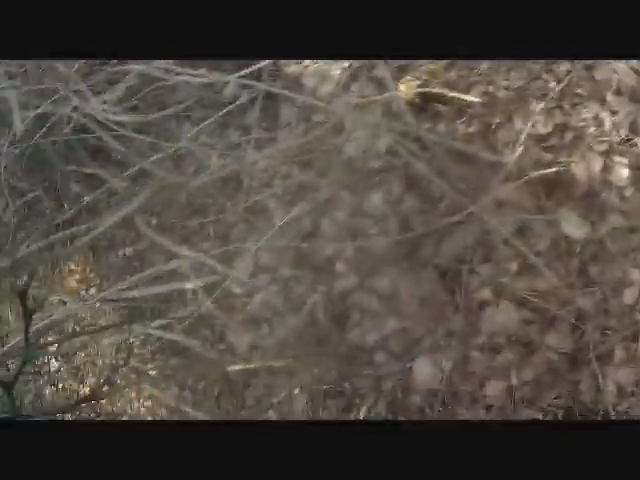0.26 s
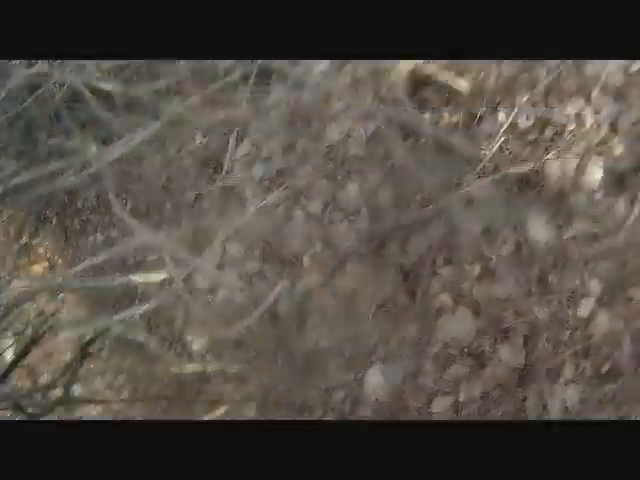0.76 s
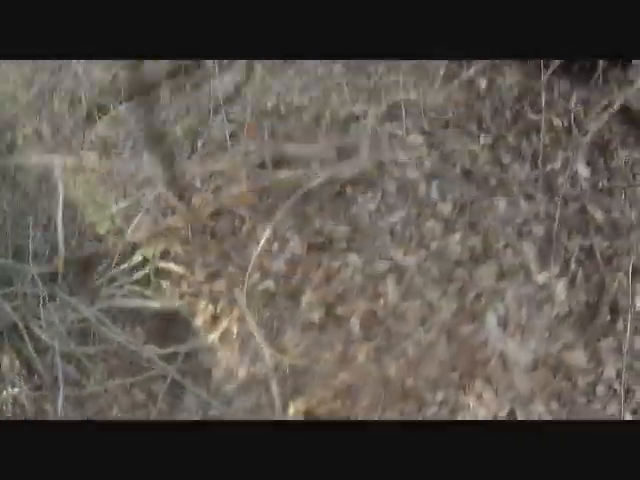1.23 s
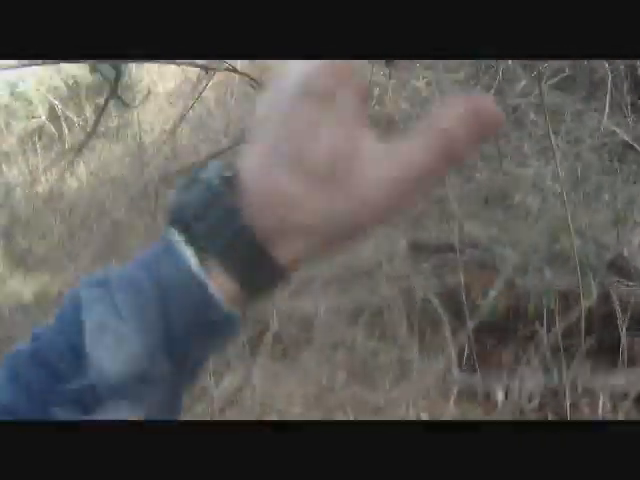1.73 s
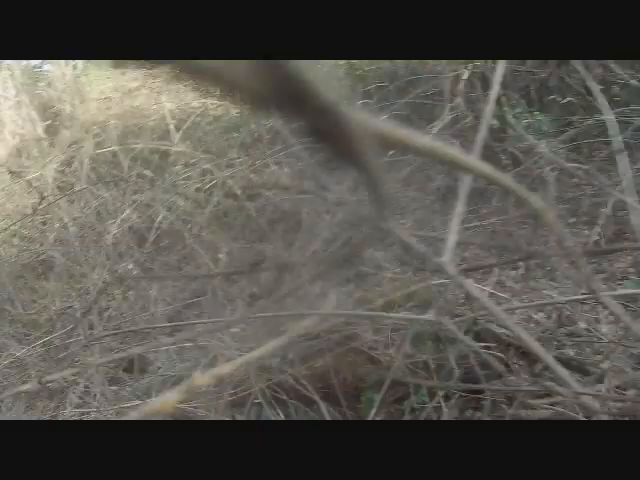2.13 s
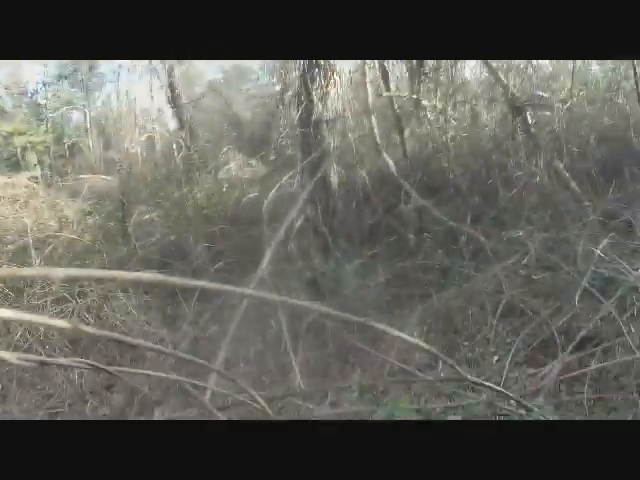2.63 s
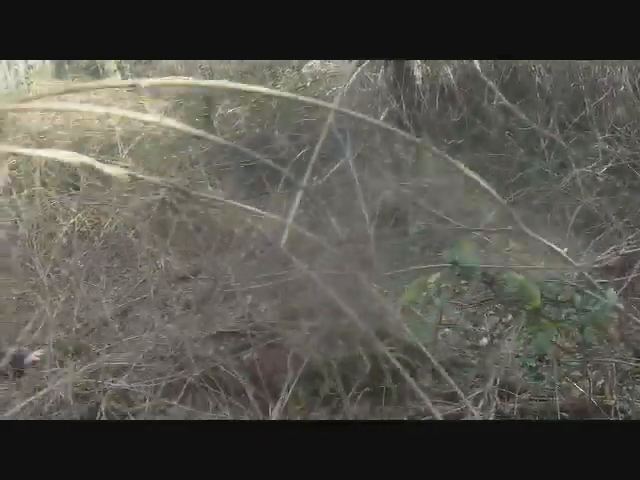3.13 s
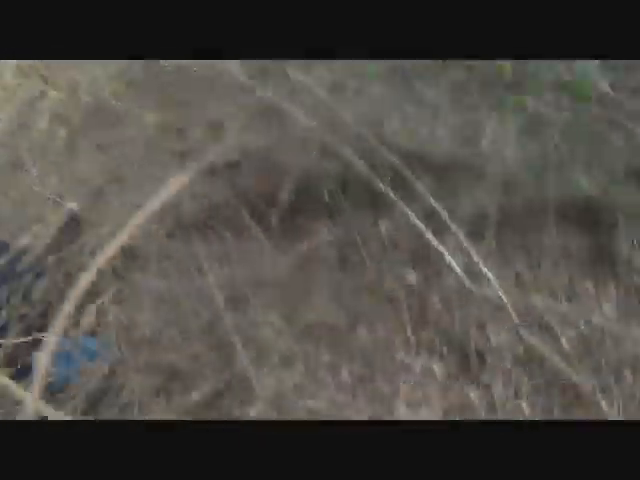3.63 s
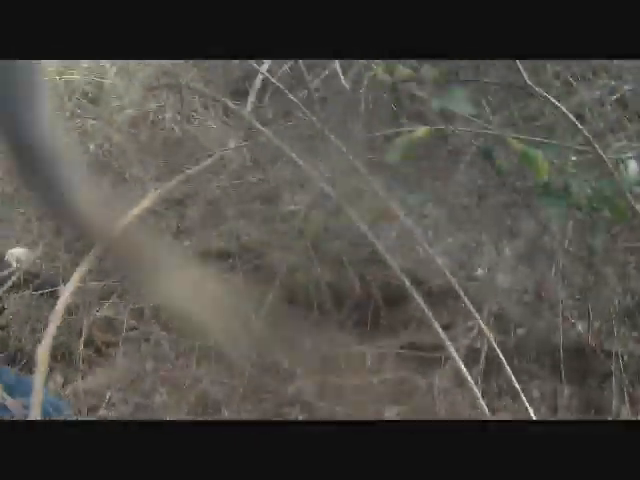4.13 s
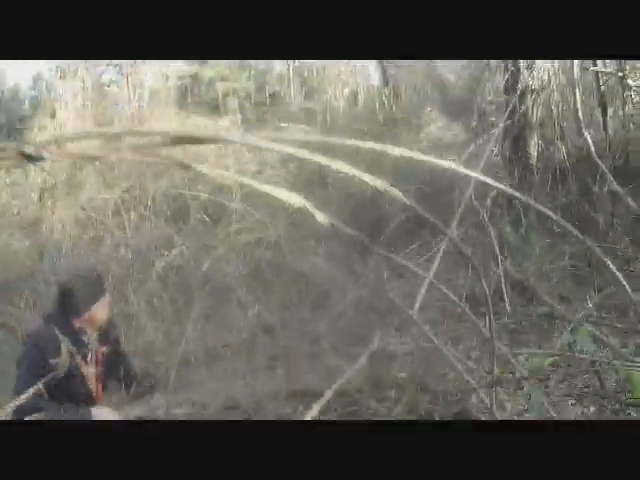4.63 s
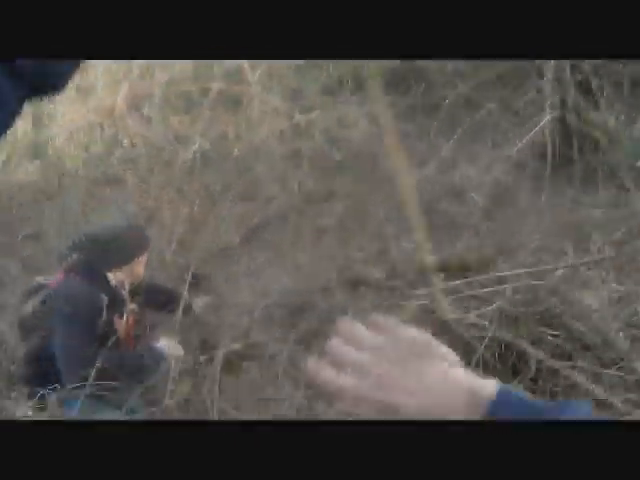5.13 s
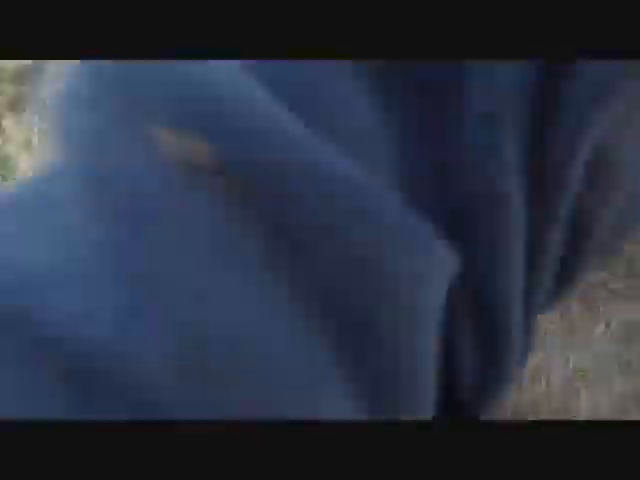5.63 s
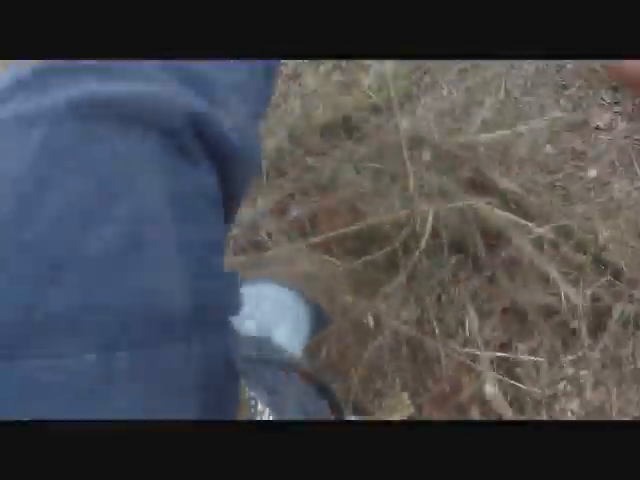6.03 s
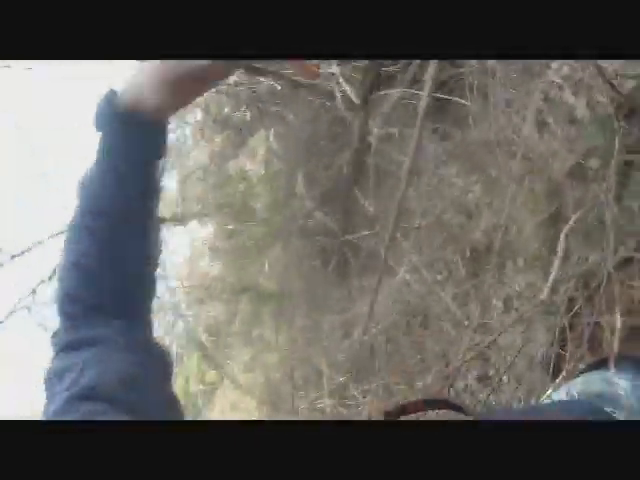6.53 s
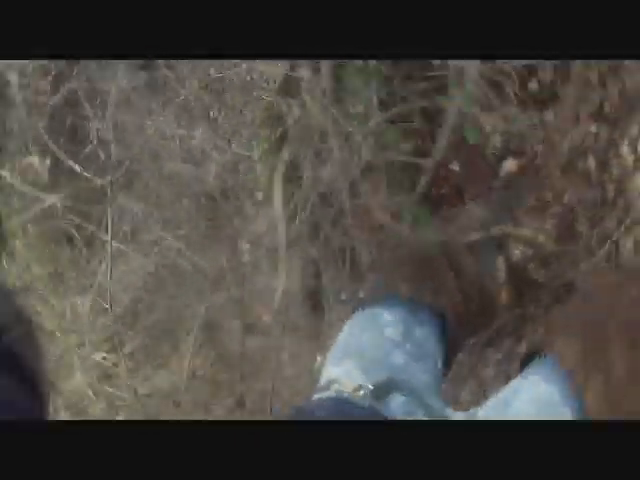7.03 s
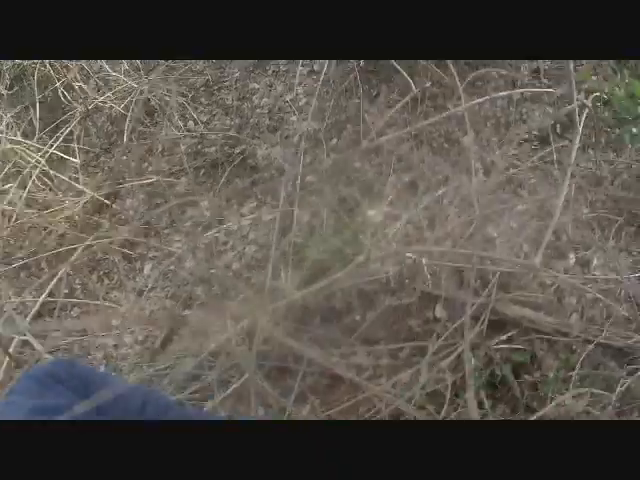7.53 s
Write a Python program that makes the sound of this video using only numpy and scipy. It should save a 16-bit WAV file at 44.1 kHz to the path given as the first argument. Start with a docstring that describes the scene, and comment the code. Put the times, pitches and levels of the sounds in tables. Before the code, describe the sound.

Someone forces a way through dry undergrowth outdoors, heard from a body-worn microphone sealed in a small plastic case. It begins with muffled leaf rustle and a few clicks, then twigs slap and scrape the hollow shell in dense, overloaded bursts. Rough dragging continues with knocks and crackle, then stops near the end, leaving dull rustle and cloth rumble.

```python
"""Cased camera pushed through dry brush

Someone pushes through dry undergrowth with a small camera in a sealed plastic case on the body.
Twigs drag over the case and slap it: shaped noise and short bursts ring the air inside and the shell.
Leaves rustle dully outside as filtered noise with faint ticks; clothing shoves the mount as low rumble.
Hard slaps overload the recorder, which ducks its gain for a moment.
"""
import sys
import numpy as np
from scipy import signal
from scipy.fft import rfft, irfft, next_fast_len
from scipy.io import wavfile
from scipy.ndimage import uniform_filter1d, map_coordinates

SR = 44100
rng = np.random.default_rng(int(sys.argv[2]) if len(sys.argv) > 2 else 0)


def generate_wav(signal):
    """Clip the signal to [-1, 1] and save it as 16-bit WAV at the path in sys.argv[1]."""
    frames = np.transpose(np.atleast_2d(signal))
    scaled = np.clip(frames, -1, 1) * 32767
    pcm = np.round(scaled).astype(np.int16)
    wavfile.write(sys.argv[1], SR, pcm)


N = 342642

# Twig slaps: start_s, shell_peak_db, boom_peak_db, struck_panel_hz
SLAPS = [(0.542, -6.5, 0, 1720), (0.554, -15, 4.5, 2220), (0.805, -13, -34, 5630),
         (0.968, -17.5, -2.5, 1380), (0.997, 4.5, -7.5, 3430), (1.024, -18, -27, 3320),
         (1.076, -17, -27, 3260), (1.094, -0.5, -9.5, 3160), (1.114, 2, -25, 3530), (1.124, 1.5, -27, 3260),
         (1.161, -12.5, -10.5, 1700.0), (1.286, -21, -28, 2500), (1.338, -8, -10, 3500),
         (1.363, 8.5, -1, 3050), (1.378, 8.5, 1.5, 2410), (1.411, -3, -21, 3600), (1.436, -6, -20, 5500),
         (1.464, 2.5, -4, 3680), (1.483, 3, -5, 5370), (1.509, 2.5, -7, 3400), (1.524, 2.5, -13, 1500),
         (1.572, 8, 9, 3500), (1.625, -5, -14, 2260), (1.788, 4.5, -21, 1430), (1.8, 6, -26, 3330),
         (1.84, -2, -8, 3200), (1.872, 4.5, -1, 3200), (1.885, 6, 0, 1920), (2.028, 10, 3, 3050),
         (2.086, 11.5, -34, 1310), (2.202, 4.5, -1, 1580), (2.242, 1.5, -6, 1550), (2.324, -0.5, -26, 1530),
         (2.349, -3, 5.5, 2010), (2.359, 11.5, 8, 2100), (2.67, -12, -2, 1590), (2.937, -13, -4.5, 1400),
         (3.02, -36, -7.5, 2470), (3.044, -9, -29, 2830), (3.222, -10, -7, 4370), (3.256, -16, -7.5, 1600),
         (3.62, 0.5, 5, 1960), (3.676, -10, -11, 2660), (3.949, 4, -4, 1240), (4.034, -5, -9.5, 1580),
         (4.134, -6, -11, 1500), (4.232, 0, 4, 2250), (4.29, -3.5, -17, 1620), (4.353, 0, -20.5, 1480),
         (4.648, 7, -20, 3150), (4.686, 5.5, -6, 1670), (4.953, 6, 6.5, 2920), (5.197, -16, -2.5, 1660.0),
         (5.213, -4, -2, 1640), (5.247, -4.5, -6, 2130), (5.347, -3, -3.5, 1220), (5.519, -1.5, -1, 3330),
         (5.566, 2, 1.5, 1840), (5.742, -2, -5, 2500), (5.752, -0.5, -9, 1700), (5.768, 8, 0, 1680),
         (5.943, 2, -1.5, 1330), (5.995, 1, 0.5, 1680), (6.082, -3.5, 1, 3260), (6.213, 2, 3, 2830),
         (6.266, -35, -4, 1210), (6.282, -17, -5, 1500), (6.318, -0.5, 3, 1620), (6.365, -2, -7, 1580),
         (6.433, 8.5, -0.5, 1520), (6.644, 5.5, 4.5, 1700), (6.834, -40, -13.5, 1770.0),
         (6.917, -15.5, -13, 2620)]
# Clothing shoving the mount: time_s, level_db
CLOTH_SHOVES = [(0.0, -39), (2.4, -34), (3.0, -51), (5.2, -42.5), (5.7, -35), (6.6, -38.5), (7.35, -32),
                (7.5, -41), (7.77, -37)]
# Air resonance in the case: centre_hz, width_hz, level_db
CAVITY = [(772, 219, 0)]
# Resonances of the plastic shell: centre_hz, width_hz, level_db
SHELL_MODES = [(1608, 440, 1.5), (2530, 506, 2.5), (3104, 390, 3.5), (3610, 230, 1), (4667, 775, -2.5)]
# Tone of the scraping hiss: frequency_hz, relative_density_db (per Hz)
HISS_TONE = [(4000, -0.5), (5800, -1), (8500, -16), (12500, -19), (15200, -34)]
# Tone of the mount and camera rumble: frequency_hz, relative_density_db (per Hz)
RUMBLE_TONE = [(15, -17), (30, -3.5), (70, 0.5), (180, -10), (400, -14), (600, -15)]
# Tone of the muffled leaves: frequency_hz, relative_density_db (per Hz)
LEAF_TONE = [(150, -22), (350, -6.5), (800, -5.5), (1050, -20.5), (5000, -31), (9000, -41), (15000, -40)]
# Brush leaning on the case: time_s, shell_level_db, boom_over_shell_db
LEANING_BRUSH = [(0.0, -46, 0.5), (0.93, -51, -2), (1.1, -40.5, 10), (1.35, -39, 6), (1.6, -42.5, 0.5),
                 (2.4, -34, 13.5), (2.62, -19, -4), (2.83, -28.5, 6.5), (3.05, -26, 8.5), (3.45, -25.5, 5),
                 (3.9, -21.5, 2.5), (4.11, -32.5, 3), (4.6, -24, 3), (5.0, -18, -0.5), (5.55, -24, 3.5),
                 (6.05, -35, 6.5), (6.7, -26, -3), (6.81, -44.5, 14.5), (7.2, -58, -13), (7.77, -50.5, 1)]
# Single twigs scraping past: start_s, length_s, loudest_at_share (0-1),
# shell_level_db, boom_over_shell_db, hiss_over_shell_db
SCRAPES = [(0.445, 0.13, 0, -32.5, 11.5, -8.5), (0.996, 0.021, 0.03, -20, 8, 1.5),
           (1.075, 0.029, 0.6, -25.5, 8, -26), (1.181, 0.072, 0.9, -30, 13.5, 0),
           (1.283, 0.12, 0.77, -24.5, 8, 1), (1.446, 0.08, 1, -22.5, -8, 2.5),
           (1.692, 0.035, 0.27, -30, -1, 6), (1.722, 0.077, .7, -35, 11.5, 3),
           (1.791, 0.025, 0.44, -7, -2, -5.5), (1.818, 0.07, 0.9, -16.5, -9, -0.5),
           (1.992, 0.037, 0.6, -8, -3, -10.5), (2.04, 0.065, 0.8, -11, -5, -2),
           (2.098, 0.098, 0.9, -19, -1, -2), (2.258, 0.16, 0.36, -18, -11, -7.5),
           (2.416, 0.13, 0.2, -27, -8, 4), (2.636, 0.16, 0.83, -17.5, 6.5, -16.5),
           (3.256, 0.2, 0.18, -16.5, -3, -10.5), (3.447, 0.11, 0.8, -13.5, -6, -9.5),
           (3.659, 0.028, 0.3, -14, -15, -5), (3.69, 0.015, 0.2, -14, 10.5, -20),
           (3.724, 0.043, 0.25, -17, -19, -6), (3.777, 0.061, 0.5, -12.5, -19, -22),
           (3.95, 0.075, 0.1, -18.5, 0, -20), (4.138, 0.15, 0.6, -11, -6, -13),
           (4.409, 0.043, 0.15, -20.5, -21, -15), (4.465, 0.065, 0.9, -12.5, -14, -5),
           (4.552, 0.09, 1, -16, -0.5, -7), (4.828, 0.107, 0.8, -23.5, 8, -28),
           (5.495, 0.084, 0.15, -17, 0, -25), (5.621, 0.16, 0.51, -13, 1, -10.5),
           (5.78, 0.12, 0, -19.5, 0, -7), (5.87, 0.083, 0.95, -15, 1, -18),
           (5.956, 0.048, 0.95, -19.5, 5, -24), (6.076, 0.039, 0.02, -17, 2, -9),
           (6.295, 0.013, 0.4, -11, -10, -18), (6.358, 0.043, 0.1, -23.5, 8.5, -18),
           (6.437, 0.036, 0.4, -17, 10, -27), (6.51, 0.041, 0.66, -17, -14, -12),
           (6.676, .12, 1, -17.5, -0.5, -6), (6.916, 0.094, 0.4, -22, 1.5, 2),
           (7.001, 0.098, 0.83, -25, 5, -1.5)]
# Blunt knocks on the microphone port: start_s, push_level_db, push_length_s
PORT_KNOCKS = [(2.0896, 12, 0.0035), (7.077, -12, 0.011), (7.268, -16, .014)]
# Thin corners of the case ringing over the hiss: centre_hz, width_hz, level_db
CORNER_MODES = [(7340, 470, 1.5), (9650, 1300, 8)]

SWELL_DB, FADE_DB = 9, 5.5  # a scrape's shell and boom start and end this far under their peak
TOUCH_S, RELEASE_S = 0.0078, 0.01  # time to land on the case and to leave it
BED_HISS_DB = -50.5  # faint hiss of the leaning brush
HISS_GROWS = 1.8  # the hiss swells more steeply than the rattle, as a factor on dB
TOP_HZ = 15500  # upper end of the recorder's band


def amp(db):
    """Decibels to linear amplitude."""
    return 10 ** (np.asarray(db) / 20)


def unit(x):
    """Scale to rms 1."""
    return x / np.sqrt(np.mean(x ** 2) + 1e-20)


def curves(rows):
    """Draw one value per sample for each column after the time."""
    times_s, *columns = np.transpose(rows)
    return [np.interp(np.arange(N) / SR, times_s, column) for column in columns]


def wobble(rate):
    """A smooth random curve, rate knots a second."""
    knots = rng.standard_normal(int(N * rate / SR) + 4)
    return map_coordinates(knots, [np.arange(N) * rate / SR])


def filtered(x, response):
    """Shape x with a complex response of frequency."""
    size = next_fast_len(len(x) + 4096)  # spare room for the tail
    spectrum = rfft(x, size) * response(np.fft.rfftfreq(size, 1 / SR))
    return irfft(spectrum, size)[:len(x)]


def colour(points):
    """Gain drawn through tone points on a log frequency axis, down to -120 dB outside them."""
    hz_points, db = np.transpose(points)
    log_points = np.log(hz_points + 1)
    return lambda hz: amp(np.interp(np.log(hz + 1), log_points, db, left=-120, right=-120))


def modes(rows):
    """Causal band-pass resonances summed with alternating sign."""
    def response(f):
        total = 0
        for k, (centre, width, db) in enumerate(rows):
            damping = 1j * f * width
            total = total + (-1) ** k * amp(db) * damping / (centre * centre - f * f + damping)
        return total
    return response


def lumpy(response, lumps_db):
    """Noise pushed by an uneven force through a response, rms 1."""
    return unit(filtered(amp(lumps_db) * rng.standard_normal(N), response))


def shell_damping(f):
    """The plastic damps the top: four gentle poles at 8 kHz."""
    return 1 / (1 + 1j * f / 8000) ** 4


def shell(f):
    """The shell's resonances under the damping of the plastic."""
    return modes(SHELL_MODES)(f) * shell_damping(f)


def boom(f):
    """The cavity resonance times a broader one, so it stands steeply above its skirts."""
    return modes(CAVITY)(f) * modes([(760, 500, 0)])(f)


def bright(f):
    """The hiss tone lifted by the ringing corners."""
    return colour(HISS_TONE)(f) * np.abs(1 + modes(CORNER_MODES)(f))


def contact():
    """Shell, boom and hiss levels in dB: leaning brush plus scrapes that land, swell, fade and let go."""
    t = np.arange(N) / SR
    lean_db, boom_over_db = curves(LEANING_BRUSH)
    power = amp([lean_db, lean_db + boom_over_db, np.full(N, BED_HISS_DB)]) ** 2
    for start, length, share, db, boom_db, hiss_db in SCRAPES:
        span = slice(round((start - TOUCH_S) * SR), round((start + length + RELEASE_S) * SR))
        loudest = np.clip(share, .05, .95) * length  # keeps a little swell and fade on every scrape
        knots = start + np.array([-TOUCH_S, 0, loudest, length, length + RELEASE_S])
        shape_db = np.interp(t[span], knots, [-40, -SWELL_DB, 0, -FADE_DB, -40])
        layers_db = np.array([shape_db, boom_db + shape_db, hiss_db + HISS_GROWS * shape_db])
        power[:, span] += amp(db + layers_db) ** 2
    return 10 * np.log10(power)


def wandering(jerk_db, depth_db):
    """The contact moves over the case, so each shell mode swells and sinks by itself, rms 1."""
    push = amp(jerk_db) * rng.standard_normal(N)
    rings = 0
    for k, mode in enumerate(SHELL_MODES):
        rings = rings + amp(depth_db * wobble(14)) * filtered(push, modes([mode])) * (-1) ** k
    return unit(filtered(rings, shell_damping))


def crackle(per_s):
    """Tiny bark ticks, each a few cycles near one mode of the shell, rms 1."""
    draw = rng.random((int(per_s * N / SR), 4))  # columns: time, mode, detune, level
    which = (draw[:, 1] * len(SHELL_MODES)).astype(int)
    hz = np.array(SHELL_MODES)[which, :1] * (.9 + .2 * draw[:, 2:3])
    t = np.arange(256) / SR
    envelope = t * hz * np.exp(-t * hz / 1.6)
    grains = amp(-18 * draw[:, 3:]) * np.sin(2 * np.pi * hz * t) * envelope
    at = (draw[:, :1] * N).astype(int) + np.arange(len(t))
    return unit(np.bincount(at.ravel(), grains.ravel(), minlength=N)[:N])


def patchy(x, depth_db):
    """The contact wanders over the case, so the colour shifts in patches of time and frequency."""
    spectra = signal.stft(x, nperseg=256)[2]
    field = uniform_filter1d(rng.standard_normal(spectra.shape), size=4, axis=0)
    field = uniform_filter1d(field, size=14, axis=1)
    return unit(signal.istft(spectra * amp(depth_db * unit(field)), nperseg=256)[1][:N])


def drag():
    """Bark catches and slips on the plastic: one jerk curve drives shell, cavity, hiss and camera shake."""
    shell_db, boom_db, hiss_db = contact()
    jerk_db = 1.9 * wobble(25) + 2.0 * wobble(90) + 1.84 * wobble(400)
    rattle = amp(shell_db) * (wandering(jerk_db, depth_db=3.2) + amp(-9) * crackle(per_s=90))
    air = amp(boom_db) * lumpy(boom, 0.72 * jerk_db + 3.5 * wobble(40))
    scraping = lumpy(bright, 0.95 * jerk_db + 1.5 * wobble(20))
    hiss = amp(hiss_db) * patchy(scraping, depth_db=3.0)
    shake = amp(boom_db - 16.5) * lumpy(colour(RUMBLE_TONE), 1.07 * jerk_db)  # the whole camera is jolted
    return rattle + air + hiss + shake


def mount():
    """Cloth rumbles through the mount as lumpy low noise; knocks push the port as half-sine pulses."""
    level_db, = curves(CLOTH_SHOVES)
    t = np.arange(N) / SR
    knocks = 0
    for start, push_db, push_s in PORT_KNOCKS:
        knocks = knocks + amp(push_db) * np.sin(np.pi * np.clip((t - start) / push_s, 0, 1))
    rumble = lumpy(colour(RUMBLE_TONE), 3.1 * wobble(14) + 3.8 * wobble(30))
    return amp(level_db) * rumble - knocks


def leaves():
    """Leaves and far twigs, muffled by the case: uneven noise with sparse faint ticks."""
    rustle = amp(-37) * lumpy(colour(LEAF_TONE), 2.4 * wobble(1.86) + 2.5 * wobble(35))
    ticks = (rng.random(N) < 14 / SR) * amp(18 * rng.random(N))  # about 14 a second
    tick_body = modes([(4500, 5200, 13.2), (10300, 4900, 4)])
    return rustle + amp(-36) * filtered(ticks, tick_body)


def peak(x):
    """Scale to peak 1."""
    return x / np.abs(x).max()


def slaps():
    """A few milliseconds of rough contact ring cavity and shell, then the twig chatters."""
    out = np.zeros(N + SR)
    t = np.arange(2048) / SR
    shell_db, _, hiss_db = contact()
    for start_s, db, boom_db, pitch_hz in SLAPS:
        start = round(start_s * SR)
        steps_db = 6.4 * np.repeat(rng.standard_normal(32), 64)  # level jumps every 64 samples
        chatter = 0.071 * np.exp(-t / 0.0062) * amp(steps_db) * np.tanh(t / 0.0021)
        hit = t / 0.0011 * np.exp(-t / 0.0011)
        force = (hit + chatter) * rng.standard_normal(len(t))
        panel = modes([(pitch_hz, .12 * pitch_hz, 9)])  # the struck panel gets its own strong ring
        rattle = peak(filtered(force, lambda f: shell(f) + panel(f) / (1 + 1j * f / 7000) ** 3))
        air = peak(filtered(t / .0003 * np.exp(-t / 0.00022), boom))
        # contact that hisses brightly at this moment also cracks brightly
        crack_db = hiss_db[start] - shell_db[start] - 2
        crack = amp(crack_db) * peak(filtered(force, bright))
        out[start:][:len(t)] += amp(db) * (rattle + crack) + amp(boom_db) * air
    return out[:N]


def scene():
    """Mix the dragging brush, mount, leaves and slaps to one channel."""
    return (drag() + mount() + leaves() + slaps())[None]


def record(dry):
    """Overload ducks the gain, the input clips, a capacitor blocks the offset, the band ends."""
    x = dry[0]
    keep = np.exp(-1 / (0.1 * SR))  # 0.1 s recovery
    excess = np.clip(np.abs(x) - .6, 0, None)
    overload = signal.lfilter([1 - keep], [1, -keep], excess)
    x = x / (1 + 60 * np.roll(overload, 90))  # the duck lags by 90 samples
    x = x / (1 + np.abs(x / 0.98) ** 8) ** (1 / 8)  # rounded clip at 0.98
    return filtered(x, lambda hz: 1j * hz / (14 + 1j * hz) / (1 + (hz / TOP_HZ) ** 120))[None]


dry = scene()
out = record(dry)
generate_wav(out)
```